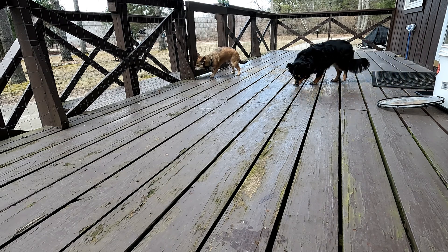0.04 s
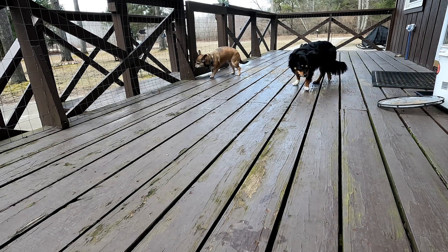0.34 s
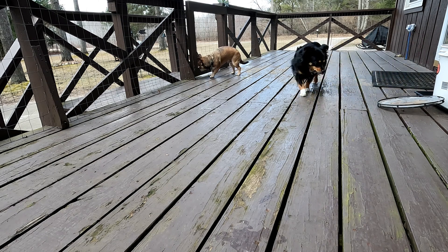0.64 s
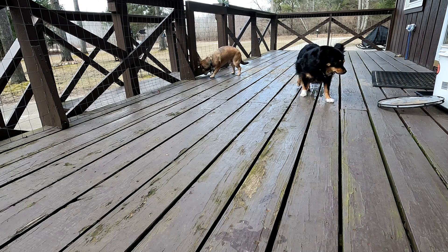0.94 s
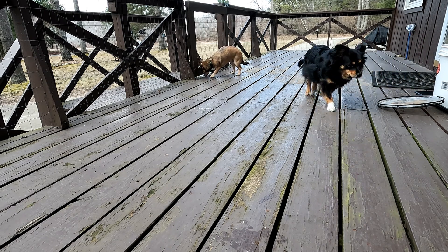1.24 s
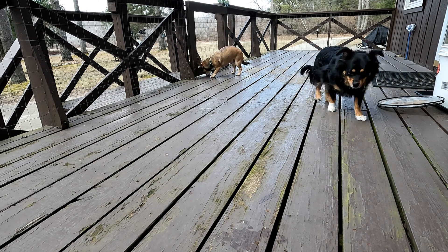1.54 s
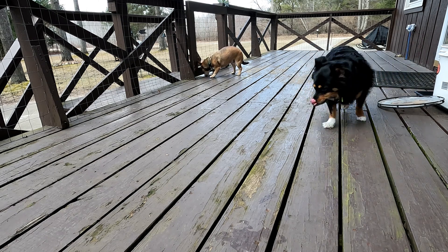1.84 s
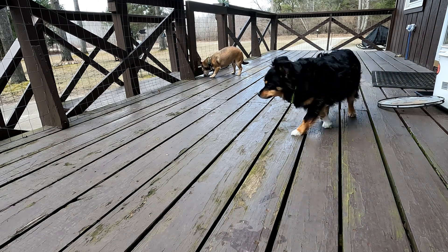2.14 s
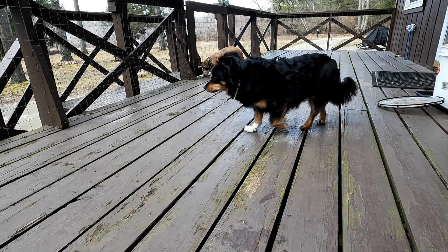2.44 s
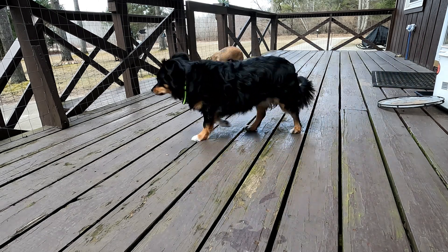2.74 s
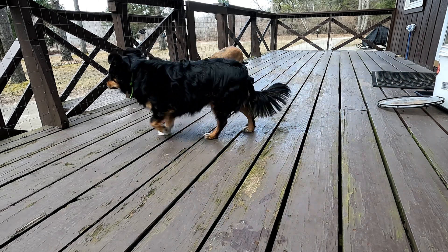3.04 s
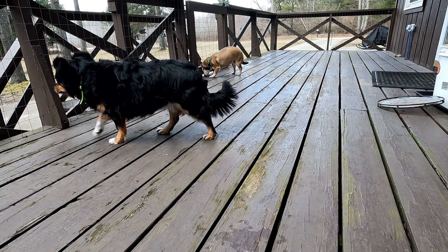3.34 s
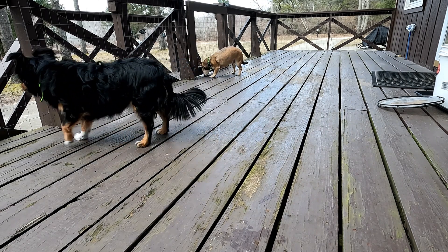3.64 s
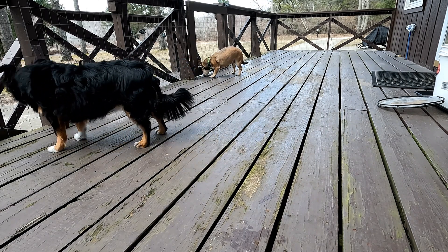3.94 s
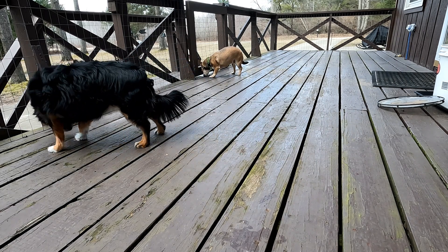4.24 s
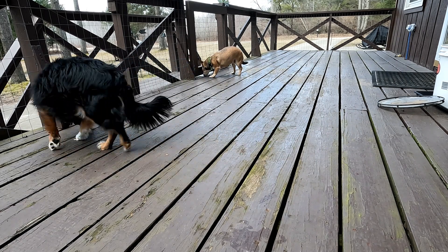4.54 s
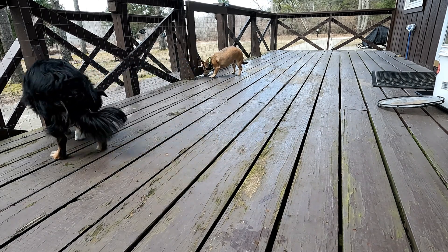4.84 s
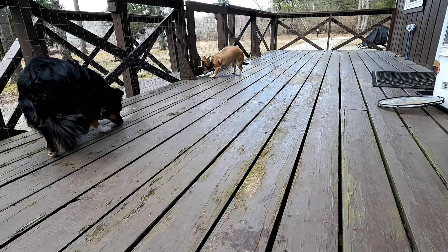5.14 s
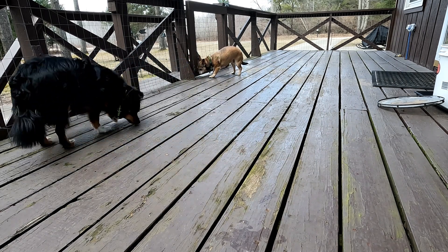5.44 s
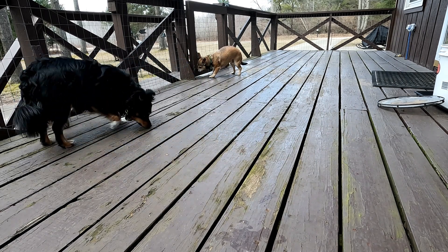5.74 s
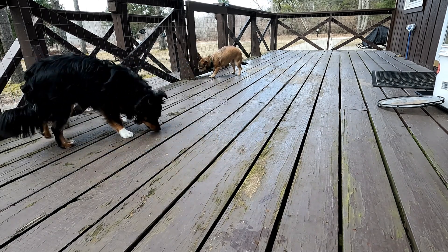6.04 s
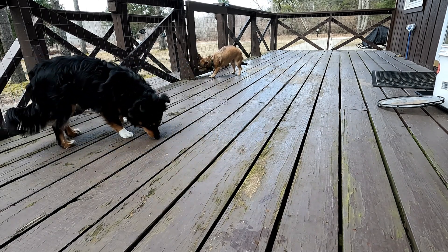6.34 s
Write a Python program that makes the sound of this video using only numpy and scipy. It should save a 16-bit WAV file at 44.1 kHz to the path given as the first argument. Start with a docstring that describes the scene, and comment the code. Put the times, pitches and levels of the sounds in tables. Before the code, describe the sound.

A dog walks across an outdoor wooden deck, its claws ticking unevenly over soft paw thuds while the boards give a low, throbbing rumble. After about four seconds the steps thin out into light scuffs and a few clicks as it turns and noses around. Quiet outdoor air and a very faint, high bird whistle lie behind. The sound is fairly near, with a slight short echo.

```python
"""A dog walks up a wooden deck and noses along its edge.
Claws tick, pads thud, paws and coat scuff; its weight sways the deck with a low rumble.
Boards and railings scatter the ticks and scuffs, and a house wall throws them back.
Behind lie quiet outdoor air and a thin, far bird whistle."""
import sys
import numpy as np
from scipy import signal
from scipy.fft import rfft, irfft, next_fast_len
from scipy.io import wavfile
from scipy.ndimage import uniform_filter1d

SR = 44100
rng = np.random.default_rng(int(sys.argv[2]) if len(sys.argv) > 2 else 0)


def inscribe(sig):
    """Save sig as 16-bit PCM at rate SR to the path in sys.argv[1].

    A 1-D sig is mono; a 2-D sig holds one channel per row.
    Samples are clipped to [-1, 1] before scaling.
    """
    pcm = np.round(np.clip(np.atleast_2d(sig).T, -1, 1) * 32767)
    wavfile.write(sys.argv[1], SR, pcm.astype(np.int16))


N = 290619
TIME_S = np.arange(N) / SR
BOARD_HZ, FIRM_DB = 1217, -48.5  # resonance of an average plank; level of a firm strike

# Outdoor air. Each row: frequency in Hz, relative density in dB.
AIR_SPECTRUM = [(18, 9), (35, 8.5), (60, 5), (95, -8.5), (120, -0.5), (170, -2), (240, -9), (400, -15.5),
                (600, -20), (850, -22), (1200, -20.5), (2000, -29), (4000, -33.5), (7400, -30),
                (10500, -41.5), (12600, -41), (14200, -52)]
# Left-right likeness of the air. Each row: frequency in Hz, correlation from 0 to 1.
AIR_COHERENCE = [(80, 0.99), (400, 0.46), (7000, 0.44), (13000, 0.1)]
# Lull in the air. Each row: time in seconds, gain in dB.
AIR_LULL = [(1.2, -0.2), (2.3, -0.5), (4.4, -2), (4.7, 0.37)]
# Slow bending mode of the deck. Each row: time in seconds, relative level in dB.
BEND_LEVELS = [(0.0, -36), (0.14, -38), (0.31, -48), (0.77, -39.5), (0.81, -48.5), (1.01, -38.5),
               (1.45, -59), (1.58, -34.5), (1.65, -57), (1.82, -40), (2.2, -51), (2.4, -39.5), (2.5, -58.5),
               (2.66, -36), (2.73, -49), (3.06, -38), (3.12, -49.5), (3.56, -35.5), (3.9, -49),
               (4.31, -61.5), (4.75, -53.5), (6.37, -61), (6.59, -46.5)]
# Next mode, strongest with the dog at mid-span. Each row: time in seconds, relative level in dB.
SPAN_LEVELS = [(0.0, -62), (0.31, -53), (1.51, -53.5), (1.78, -35.5), (2.33, -46.5), (2.37, -32.5),
               (2.48, -31), (2.62, -48), (2.77, -37), (3.16, -59.5), (3.49, -41.5), (3.9, -68.5),
               (6.5, -60)]
# Colour of a hard contact on the boards. Each row: frequency in Hz, gain in dB.
CONTACT_SPECTRUM = [(100, -18.5), (400, 1.5), (850, -6.5), (1200, -2), (2200, -4), (4000, -5.5),
                    (6000, -4.5), (7800, -5.5), (8800, -8), (10000, -8), (12500, -12), (14500, -13.5)]
# Paws, coat and muzzle brushing the boards. Each row: peak time in seconds, length in seconds,
# level in dB, treble tilt in dB, rasp centre in Hz, rasp strength in dB.
SCUFF_STROKES = [(0.108, 0.056, -73.5, -1.5, 2980, -4), (0.394, 0.16, -62.5, -1, 4450, -0.5),
                 (0.737, 0.082, -63.5, -8.5, 2100, 6.5), (0.905, 0.02, -66, 1.5, 4530, 8.5),
                 (1.758, 0.007, -61, -5, 3000, 9), (1.79, 0.012, -56, -10.5, 2010, 14),
                 (1.807, 0.016, -55, 2, 7100, 11), (1.907, 0.045, -65, 4.5, 5030, 6),
                 (1.969, 0.011, -63.5, -5.5, 2720, 4), (2.021, 0.04, -70, 4, 6250, 7),
                 (3.42, 0.58, -80, 9, 6640, -1), (4.595, 0.083, -62, -4.5, 2280, -2.5),
                 (4.709, 0.019, -68.5, -6, 2380, 6), (4.974, 0.056, -67.5, -5.5, 2500, -10),
                 (5.035, 0.04, -64.5, -7, 2200, 5), (5.181, 0.13, -69, -6, 3180, -1),
                 (5.297, 0.028, -66.5, 0.5, 6000, -3), (5.599, 0.025, -67, 1, 7310, 1),
                 (5.742, 0.02, -70.5, -3, 2400, 6), (5.837, 0.06, -73, 8, 11000, 1),
                 (5.895, 0.019, -58.5, -0.5, 3640, 8), (6.056, 0.022, -67, 4.5, 7000, 8),
                 (6.128, 0.081, -68.5, 2.5, 12500, -3), (6.21, 0.088, -68, 4.5, 6840, 3),
                 (6.392, 0.032, -68, -4.5, 3220, 7), (6.517, 0.11, -71.5, 3, 6640, -2)]
# Claw strikes. Each row: start in seconds, level in dB, treble tilt in dB, plank resonance in Hz,
# second ring in Hz, ring strength in dB.
CLAW_STRIKES = [(0.58, -64, 4, 1440, 6400, 27), (0.628, -63, -11, 1460, 6360, -2),
                (0.798, -66.5, -6, 1140, 8750, 0), (0.858, -60, 4, 1170, 4870, 20),
                (0.937, -52.5, -3.5, 1210, 7200, -15), (1.049, -66, -14, 1210, 6340, -5),
                (1.119, -66, -8.5, 1320, 3100, 15.5), (1.261, -65, -23, 730, 890, 7),
                (1.405, -71, -10, 1300, 2590, 19), (1.484, -69, -10.5, 1310, 3740, 22),
                (1.6814, -56, -8.5, 1380, 3430, 16), (1.801, -58, -5, 770, 1070, -4),
                (1.836, -68.5, -3, 1220, 3160, 23), (1.878, -54, -2.5, 770, 1290, -11),
                (2.126, -66.5, 1.5, 1090, 5700, 12), (2.191, -70.5, -8, 1190, 2560, 4),
                (2.326, -64.5, -4.5, 890, 2830, 8), (2.686, -60.5, 3, 1950, 5300, 14),
                (2.741, -67, -2.5, 1770, 3200, -2), (2.811, -56, -6.5, 1210, 2900, 7.5),
                (2.876, -64.5, -1.5, 1490, 4630, -3), (2.96, -69.5, -9.5, 1490, 2780, 7),
                (3.008, -68, -10.5, 1510, 2600, 17), (3.09, -68.5, -6, 1410, 4330, 14),
                (3.248, -58.5, -0.5, 1210, 8300, -10), (3.34, -65.5, 0, 900, 3200, 14),
                (3.417, -64.5, -1, 1350, 3380, 5), (3.532, -58, 6.5, 1530, 6660, 18),
                (3.583, -54.5, 4, 1200, 5260, 7), (3.625, -68.5, -1.5, 1730, 3250, 2),
                (3.725, -68, 2, 1780, 6420, -3), (5.288, -61, 5, 1130, 5900, 7),
                (5.889, -56.5, 5, 2360, 4900, 14)]
# Bare claw tips as the dog stops and turns. Each row: start in seconds, level in dB.
TIP_CLICKS = [(3.785, -68.5), (3.807, -70), (4.646, -70), (4.685, -64.5), (4.895, -66), (5.012, -67),
              (5.234, -65.5), (5.681, -69.5), (6.028, -68)]
# Far steps come more through the plank. Each row: time in seconds, resonance strength in dB.
PLANK_RESONANCE = [(1.1, 20.5), (1.7, 2)]
# Planks humming under a pad. Each row: peak time in seconds, spread in seconds, level in dB, mode in Hz.
PLANK_HUMS = [(1.71, 0.018, -39, 97.3), (6.266, 0.024, -66.5, 472), (6.569, 0.018, -68.5, 430)]
# Far bird. Each row: start in seconds, length in seconds, level in dB.
BIRD_WHISTLES = [(2.17, .68, -82.5), (4.66, 0.42, -77.5), (5.67, .41, -75.5), (6.46, .29, -74)]
# Ring of boards and railings. Each row: frequency in Hz, time to fall 60 dB in seconds.
PORCH_DECAY = [(300, 0.096), (1300, 0.36), (4000, 0.28), (12000, 0.013)]
# Dog position. Each row: time in seconds, left over right in dB.
DOG_PAN = [(0, -2.5), (1.9, -3.5), (2.8, 0.5), (6.5, 0.5)]
# Channel colour. Each row: frequency in Hz, left over right in dB.
CHANNEL_BALANCE = [(30, -2.5), (60, 2), (400, -4), (1500, 0), (6000, 1.1), (12000, 6.5)]


def gain_of(db):
    """Decibels to amplitude."""
    return 10 ** (np.asarray(db) / 20)


def pan_gains(left_over_right_db):
    """Left and right gains for a level difference."""
    return gain_of(np.array([left_over_right_db, -left_over_right_db]) / 2).reshape(2, -1)


def unit_rms(x):
    """Scales to an rms of one."""
    return x / np.sqrt(np.mean(abs(x) ** 2) + 1e-20)


def at_hz(table, hz):
    """Interpolates a table over log frequency."""
    table_hz, values = np.transpose(table)
    return np.interp(np.log(hz + 1), np.log(table_hz), values)


def at_time(table, time_s=TIME_S):
    """Interpolates a table over time."""
    return np.interp(time_s, *np.transpose(table))


def add(mix, start_s, sound):
    """Mixes a sound in at start_s."""
    part = mix[max(round(start_s * SR), 0):][:len(sound)]
    part += sound[:len(part)]


def minimum_phase(x, gain):
    """Filters by a gain per bin, without pre-ringing."""
    log_gain = np.log(np.maximum(gain, 1e-5))
    mirrored = np.concatenate([log_gain, log_gain[-2:0:-1]])
    return irfft(rfft(x) * np.exp(np.conj(signal.hilbert(mirrored)))[:len(gain)])


def outdoor_air(level_db=-58.5, patch_db=2.0):
    """Far noise with drifting patches and a lull, partly alike left and right."""
    hz = np.fft.rfftfreq(2048, 1 / SR)
    noise = rng.standard_normal((5, N // 512 + 5, len(hz)))
    left, unrelated = noise[0] + 1j * noise[1], noise[2] + 1j * noise[3]
    patches = unit_rms(uniform_filter1d(uniform_filter1d(noise[4], size=10, axis=0), size=30, axis=1))
    coherence = at_hz(AIR_COHERENCE, hz)
    right = coherence * left + np.sqrt(1 - coherence ** 2) * unrelated
    spectra = np.array([left, right]) * gain_of(at_hz(AIR_SPECTRUM, hz) + patch_db * patches)
    air = signal.istft(spectra.transpose(0, 2, 1), nperseg=2048, noverlap=1536)[1][:, :N]
    return gain_of(level_db + at_time(AIR_LULL)) * unit_rms(air)


def deck_mode(hz, wander, size=N):
    """One deck mode, ringing with a wandering phase."""
    drift = unit_rms(uniform_filter1d(rng.standard_normal(size), int(2 * SR / hz)))
    cycles = rng.random() + np.cumsum(hz * (1 + wander * drift)) / SR
    return unit_rms(np.sin(2 * np.pi * cycles))


def deck_sway(twist_db=-8.5, upper_hz=88, upper_width_hz=68, upper_db=-15.5, rest_hz=26, rest_db=-58):
    """The deck bends under the steps and rocks to one side; crowded upper modes follow the motion."""
    # A weaker twisting mode beats with the bending one, so the rumble throbs.
    throb = deck_mode(hz=36.06, wander=0.0802) + gain_of(twist_db) * deck_mode(hz=28.4, wander=0.1904)
    bend = gain_of(at_time(BEND_LEVELS) + 0.5) * unit_rms(throb)
    span = gain_of(at_time(SPAN_LEVELS) - 2) * deck_mode(hz=57.57, wander=0.0623)
    motion = np.sqrt(abs(uniform_filter1d((bend + span) ** 2, size=9000)))
    hz = np.fft.rfftfreq(N, 1 / SR)
    upper_bins, tremor_bins = rfft(rng.standard_normal((2, N)))
    upper_bins /= 1 + ((hz - upper_hz) / (upper_width_hz / 2)) ** 4
    tremor_bins /= (1 + ((hz - rest_hz) / (rest_hz / 2)) ** 2) ** 1.1
    upper = gain_of(upper_db) * motion * unit_rms(irfft(upper_bins, N))
    tremor = gain_of(rest_db) * unit_rms(irfft(tremor_bins, N))  # the joists never quite rest
    return pan_gains(left_over_right_db=-4) * bend + span + upper + tremor


def through_wood(force, treble_db, board_hz, ring_hz, ring_db, sharpness, board_db, ripple_db):
    """Colours a contact force: plank resonance, second ring, and a tilt for the touch's hardness."""
    hz = np.fft.rfftfreq(len(force), 1 / SR) + 1
    ripple = np.interp(hz, np.linspace(0, SR / 2, num=70), rng.standard_normal(70))
    plank = gain_of(board_db) / (1 + (sharpness * (hz / board_hz - 1)) ** 2)
    ring = gain_of(ring_db) / (1 + (sharpness * (hz / ring_hz - 1)) ** 2)
    gain = gain_of(at_hz(CONTACT_SPECTRUM, hz) + ripple_db * ripple) * (1 + plank + ring)
    gain /= np.sqrt(1 + (0.74 * board_hz / hz) ** 4)  # little radiation below resonance
    top_hz = 9400 * 2 ** (np.clip(treble_db, -10, 12) / 30)  # a blunt touch lacks the very top
    gain /= np.sqrt(1 + (hz / top_hz) ** 10)
    treble, middle = hz > 4000, (hz > 800) & (hz <= 4000)
    shelf = 1.95 / (1 + (3800 / hz) ** 9) + 0.27 * np.log2(np.maximum(hz, 1500) / 1500)
    power = abs(rfft(force) * gain) ** 2
    tilt_db = treble_db - 10 * np.log10(power[treble].sum() / power[middle].sum())
    return minimum_phase(force, gain * gain_of(tilt_db * shelf))


def scuffs(grain_db=2.0, rise_share=0.54, spot_count=3):
    """Friction: a swell of fine, uneven slips, changing colour from one spot of wood to the next."""
    out = np.zeros(N + SR)  # 1 s of lead-in
    for peak_s, length_s, level_db, treble_db, ring_hz, ring_db in SCUFF_STROKES:
        size = 2 * next_fast_len(int(2 * length_s * SR))
        t = (np.arange(size) - size // 2) / SR
        slope_s = length_s * np.where(t < 0, rise_share, 1 - rise_share)
        swell = np.exp(-0.5 * abs(t / slope_s) ** 3)
        clumps = unit_rms(uniform_filter1d(rng.standard_normal(size), size=120))
        slips = rng.standard_normal((spot_count, size)) * gain_of(grain_db * clumps)
        spots = [unit_rms(through_wood(slip, treble_db, BOARD_HZ, ring_hz, ring_db,
                                       sharpness=5, board_db=4, ripple_db=2.5)) for slip in slips]
        centres = np.linspace(-0.5, 0.5, spot_count)[:, None]
        weights = np.exp(-0.5 * (spot_count * (t / length_s - centres)) ** 2)
        rub = (spots * weights).sum(0) / np.linalg.norm(weights, axis=0)
        add(out, 1 + peak_s + t[0], gain_of(level_db) * swell * rub)
    return out[SR:]


def claw_tick(treble_db, board_hz, ring_hz, ring_db, chatter_s, board_db=5, second_toe_db=-14):
    """A claw lands with a short chatter; a neighbouring toe follows milliseconds later."""
    t = np.arange(2048) / SR
    delayed_t = np.maximum(t - rng.uniform(0.004, 0.0099), 0)
    landing_s = 0.00015 + 0.11 * chatter_s  # a dragging claw sets down more gently
    first, second = (-np.expm1(-age / landing_s) * np.exp(-age / chatter_s) for age in (t, delayed_t))
    force = rng.standard_normal(len(t)) * (first + gain_of(second_toe_db) * second)
    whitening = uniform_filter1d(abs(rfft(force)) ** 2, size=30) ** -0.5
    force = minimum_phase(force, whitening)  # the blow drives all pitches alike
    tick = through_wood(force, treble_db, board_hz, ring_hz, ring_db,
                        sharpness=9.2, board_db=board_db, ripple_db=3.5)
    return tick / np.sqrt(np.mean(tick[t < 0.008] ** 2))


def claws(firm_chatter_s=0.00072, max_chatter_s=0.0042, softer_db=6.5, duller_db=33):
    """Firm, hard strikes end at once; soft, blunt ones drag; bare tips click thinly."""
    out = np.zeros(N)
    for start_s, level_db, treble_db, board_hz, ring_hz, ring_db in CLAW_STRIKES:
        doublings = (FIRM_DB - level_db) / softer_db - treble_db / duller_db
        chatter_s = min(firm_chatter_s * 2 ** doublings, max_chatter_s)
        board_db = at_time(PLANK_RESONANCE, start_s)
        tick = claw_tick(treble_db, board_hz, ring_hz, ring_db, chatter_s, board_db)
        add(out, start_s, gain_of(level_db) * tick)
    for start_s, level_db in TIP_CLICKS:
        tick = claw_tick(treble_db=9.5, board_hz=BOARD_HZ, ring_hz=7600, ring_db=5, chatter_s=0.0027)
        add(out, start_s, gain_of(level_db) * tick)
    return out


def pads(firm_thud_db=-61, centre_hz=221, decay_s=0.013, level_follow=0.49):
    """A soft pad lands with each claw strike and gives the plank a short, low thud."""
    out, t = np.zeros(N), TIME_S[TIME_S < 10 * decay_s]
    envelope = t / decay_s * np.exp(1 - t / decay_s)
    for start_s, strike_db, *_ in CLAW_STRIKES:
        hz = centre_hz * 2 ** rng.uniform(-0.536, 0.476)
        level_db = firm_thud_db + level_follow * (strike_db - FIRM_DB)
        add(out, start_s, gain_of(level_db) * envelope * np.sin(2 * np.pi * hz * t))
    return out


def patter(mean_db=-77.5, walk_s=3.7, count=18):
    """Faint, dry touches of claws and grit while the dog walks."""
    out = np.zeros(N)
    for walk_share, strength, octaves in rng.random((count, 3)):
        ring_hz = 2 * BOARD_HZ * 2 ** octaves
        touch = claw_tick(treble_db=-3, board_hz=BOARD_HZ, ring_hz=ring_hz, ring_db=2, chatter_s=0.0054)
        add(out, walk_share * walk_s, gain_of(mean_db) * (0.5 + strength) * touch)
    return out


def plank_hums(wander=0.1045, size=32768):
    """A pad sets one plank humming; the hum swells and dies."""
    out, t = np.zeros(N + size), (np.arange(size) - size // 2) / SR
    for peak_s, spread_s, level_db, hz in PLANK_HUMS:
        swell = np.exp(-0.5 * (t / spread_s) ** 2)
        add(out, peak_s, gain_of(level_db) * swell * deck_mode(hz, wander, size))
    return out[size // 2:][:N]


def bird(start_hz=7590, sag_hz_per_s=140, width_hz=230):
    """Thin, buzzy whistles that sag in pitch, blurred by distance."""
    out = np.zeros(N)
    lowpass = signal.butter(2, width_hz / 2, fs=SR, output="sos")
    for start_s, length_s, level_db in BIRD_WHISTLES:
        size = int(length_s * SR)
        blur = signal.sosfilt(lowpass, rng.standard_normal(size) + 1j * rng.standard_normal(size))
        hz = start_hz - sag_hz_per_s * TIME_S[:size]
        tone = (blur * np.exp(2j * np.pi * np.cumsum(hz) / SR)).real
        add(out, start_s, gain_of(level_db) * unit_rms(tone) * signal.windows.tukey(size, 0.4))
    return out


def porch_reflections(x, tail_db=-7, wall_s=0.025, wall_db=-19, size=16384):
    """Boards and railings scatter a short tail; a wall returns one faint echo."""
    taps = rng.standard_normal((2, size)) * (rng.random((2, size)) < 0.1)
    hz, t, spectra = signal.stft(taps, SR, nperseg=128)
    early = 1 + 2.9 * np.exp(-t / 0.053)  # the nearest boards answer first and strongest
    decay = gain_of(-60 * t / at_hz(PORCH_DECAY, hz)[:, None])
    response = signal.istft(spectra * early * decay, SR, nperseg=128)[1]
    response *= gain_of(tail_db) / np.linalg.norm(response, axis=1, keepdims=True)
    response[:, round(wall_s * SR)] += gain_of(wall_db)
    return signal.fftconvolve(x[None], response, axes=1)[:, :N]


def scene():
    """The dog moves from the right to the centre of the rumbling deck; air and bird lie behind."""
    contacts = claws() + scuffs() + patter()
    dog = contacts * pan_gains(at_time(DOG_PAN)) + porch_reflections(contacts) + pads()
    deck = deck_sway() + plank_hums()
    return dog + deck + outdoor_air() + np.array([bird(), bird()])


def record(dry, cutoff_hz=14900):
    """Colours left and right slightly apart, then limits the band."""
    balance_db = at_hz(CHANNEL_BALANCE, np.fft.rfftfreq(N, 1 / SR))
    coloured = irfft(rfft(dry) * pan_gains(balance_db), N)
    lowpass = signal.firwin(255, cutoff_hz, window=("kaiser", 9), fs=SR)
    return signal.oaconvolve(coloured, lowpass[None], "same", axes=1)


dry = scene()
out = record(dry)
inscribe(out)
```